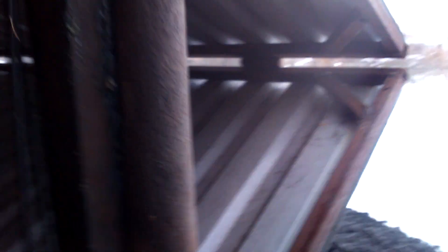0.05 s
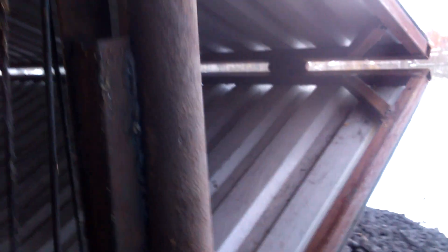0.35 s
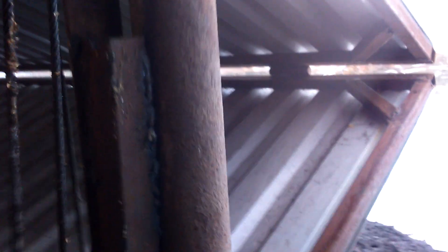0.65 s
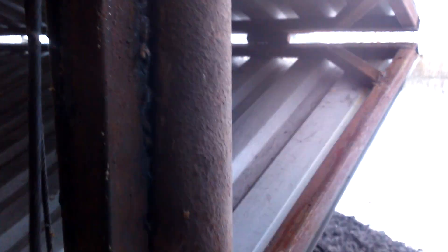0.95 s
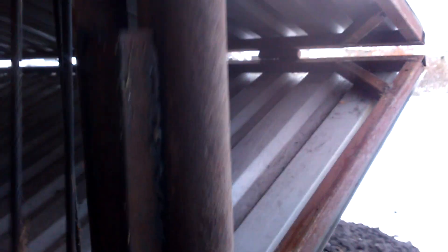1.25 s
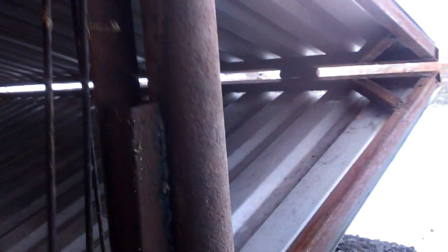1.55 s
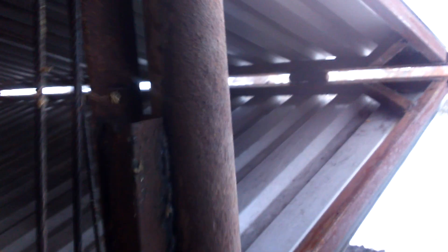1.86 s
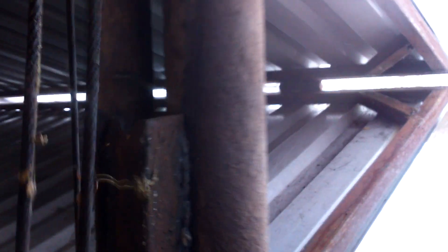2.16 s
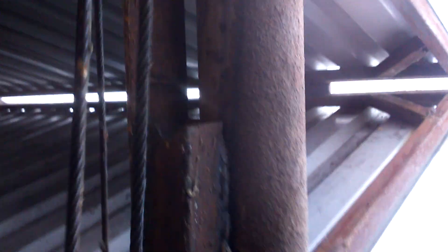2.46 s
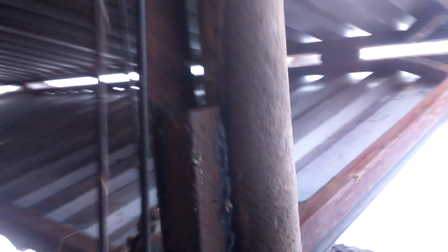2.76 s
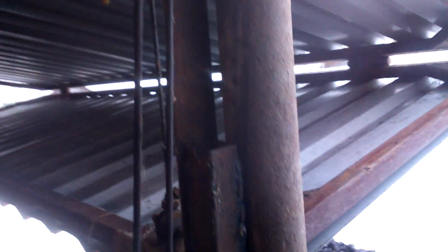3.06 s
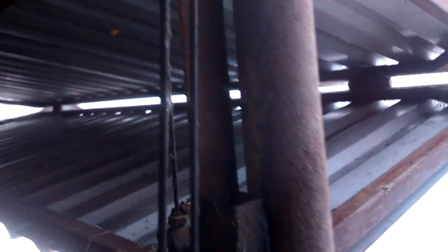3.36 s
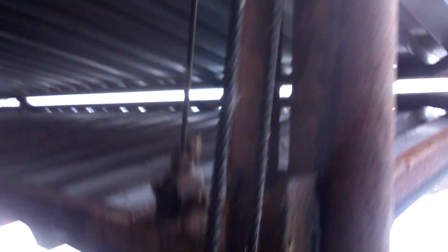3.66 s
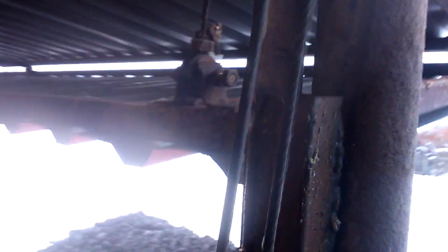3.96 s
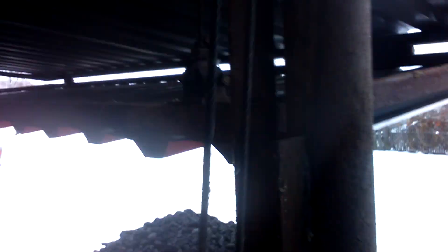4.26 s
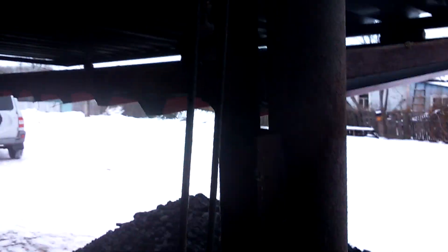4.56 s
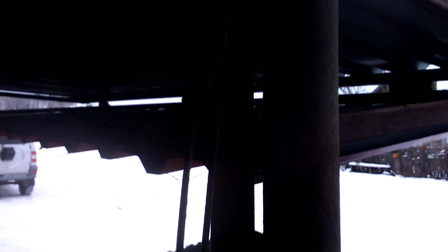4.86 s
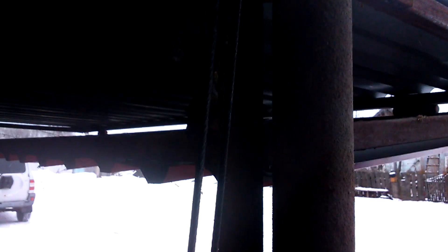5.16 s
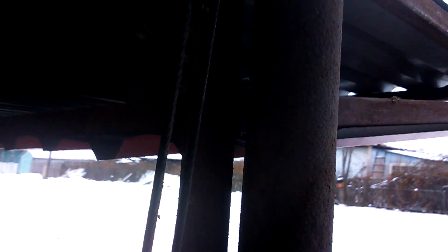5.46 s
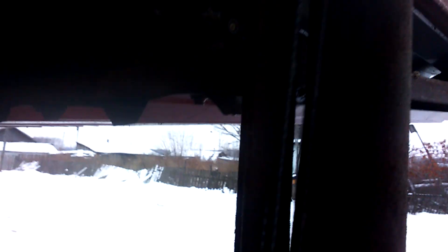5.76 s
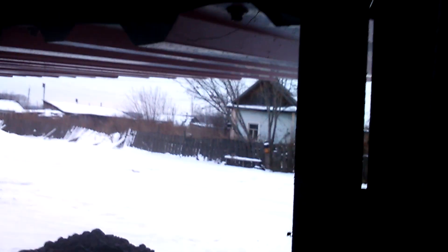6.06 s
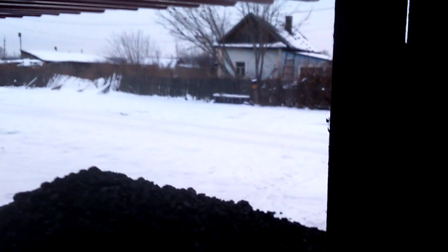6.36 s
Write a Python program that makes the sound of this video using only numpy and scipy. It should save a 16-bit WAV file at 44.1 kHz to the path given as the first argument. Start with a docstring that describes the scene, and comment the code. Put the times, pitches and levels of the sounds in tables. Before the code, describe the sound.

A corrugated steel folding gate is hauled up by cables. It starts with a loud clanking jolt and a bright scrape, then loose sheets chatter while the big panels boom and groan, with uneven knocks and sharp snaps. The track sings faintly. A very sharp, ringing snap comes late, and the gate glides to rest with faint handling clicks. Heard close by the gate post on one small, hissing microphone.

```python
"""Steel folding gate, hauled up

Close by the gate post, on one small, hissing microphone. Cables haul up the corrugated leaves,
which jolt and clank in their frame; loose sheets chatter and the big panels boom and groan.
A few sharp snaps cut through. The gate glides to rest, with faint handling clicks at the end."""
import sys
import numpy as np
from scipy import signal
from scipy.fft import rfft, irfft
from scipy.io import wavfile
from scipy.ndimage import uniform_filter1d

SR = 44100
rng = np.random.default_rng(int(sys.argv[2]) if len(sys.argv) > 2 else 0)


def put_to_file(sound):
    """Save the sound as 16-bit audio at rate SR, in the file named by the first command-line argument."""
    columns = np.atleast_2d(sound).T  # one column per channel
    safe = np.clip(columns, -1, 1)
    whole_steps = np.round(safe * 32767)
    wavfile.write(sys.argv[1], SR, whole_steps.astype(np.int16))


N = 291500
TIME = np.arange(N) / SR

# Leaves jolting in the frame. Each row: start in seconds, relative level in dB, brightness in
# nominal dB, number of hard blows.
JOLTS = [(0.278, -20, -23, 1), (.304, -7, -16.5, 4), (.679, -16, -18.5, 1), (.818, -15.5, -19, 2),
         (1.004, -18.5, -13, 1), (1.364, -17, -23, 1), (1.499, -21, -19, 1), (1.632, -21, -18, 4),
         (1.859, -27, -6.5, 1), (1.942, -22, -14, 1), (2.249, -27, -27, 1), (2.295, -30, -23, 1),
         (2.598, -18, -16, 1), (2.655, -18.5, -15, 1), (2.7365, -16.5, -9.5, 1), (2.786, -19.5, -17, 1),
         (2.881, -26.5, -9.5, 1), (2.956, -30, -10, 1), (3.106, -25.5, -16, 1), (3.329, -21.5, -17, 1),
         (3.343, -28, -9, 1), (3.39, -25, -25, 1), (3.541, -26.5, -26, 1), (3.653, -25, -16.5, 1),
         (3.71, -29.5, -22, 1), (3.8153, -26, -27.5, 1), (3.879, -22, -20, 1), (3.963, -24.5, -22, 1),
         (4.063, -26.5, -19, 1), (4.137, -20.5, -14.5, 1), (4.174, -34, -31, 1), (4.271, -27.5, -24, 1),
         (4.351, -29, -31, 1), (4.487, -32.5, -19, 1), (4.663, -35, -17, 1), (4.9, -27, -21, 1),
         (4.984, -21.5, -34, 2)]
# The steady haul, easing near the top. Each row: time in seconds, then relative levels in dB of
# chatter, groan and boom.
STEADY_HAUL = [(0, -34, -35, -30.5), (1.3, -34.5, -34.5, -31), (2.1, -35, -39.5, -33.5),
               (3.25, -29.5, -38, -33), (3.7, -34.5, -42.5, -37.5), (4.65, -40, -36.5, -36.5),
               (4.84, -45, -40, -41.5), (5.25, -43, -42.5, -36), (5.85, -45.5, -43, -42),
               (6.17, -64, -55, -44), (6.26, -75, -58.5, -47.5), (6.61, -63, -65, -55.5)]
# The gate catches and shakes. Each row: start and length in seconds, then relative levels in dB of
# chatter, groan, boom and scrape.
GATE_LURCHES = [(0.254, 0.056, -23, -23.5, -21, -37), (0.343, .12, -14.5, -29.5, -25.5, -14.5),
                (0.77, 0.12, -23, -42, -30.5, -38), (1.34, 0.076, -47, -24.5, -37, -50),
                (1.5, 0.088, -28, -38, -34, -42), (1.665, 0.19, -31, -43, -42, -41),
                (2.18, 0.19, -47, -33, -39, -56), (2.573, 0.23, -25.5, -31, -30.5, -31.5),
                (2.956, .09, -66, -29.5, -33, -39), (4.048, 0.079, -36, -37, -39, -61),
                (4.915, 0.1, -29.5, -29, -32.5, -32), (5.688, 0.44, -65, -41.5, -46, -68)]
# Sharp snaps, then faint handling clicks near the microphone at the end.
# Each row: start in seconds, relative level in dB, click pitch in Hz.
SNAPS_AND_CLICKS = [(.2609, -9.5, 9300), (.656, -20, 10500), (1.13, -19.5, 11000), (1.3515, -6, 9600),
                    (2.1557, -10, 8600), (2.1955, -6.5, 8460), (4.138, -15, 9800), (4.8985, -0.5, 9300),
                    (4.902, 0.5, 9500), (4.913, 0.5, 10400), (4.931, -14, 9550), (5.025, -18, 10500),
                    (6.118, -30, 8950), (6.32, -33, 9000), (6.429, -29, 9000)]
# Grazed fittings. Each row: start in seconds, pitch in Hz, peak in dB, the rasp's t60 in seconds.
FITTING_PINGS = [(1.349, 3960, -22, .06), (2.16, 2250, -28, .16), (2.2, 1950, -24.5, .12),
                 (2.53, 2800, -33, .12), (2.55, 2230, -28, .14), (4.612, 3500, -39, .07),
                 (4.712, 780, -28, .16), (4.722, 960, -28, .14), (4.899, 4255, -22, .07),
                 (4.9, 2450, -26, .18)]
# Brushing as the gate comes to rest. Each row: peak time and half length in seconds, level in dB.
BRUSH_SWELLS = [(5.503, 0.094, -41.5), (6.38, 0.093, -55.5)]
# How loudly the track sings. Each row: time in seconds, level in dB.
TRACK_LEVELS = [(0, -63.5), (1.4, -53), (2.9, -38.5), (3.5, -44.5), (4.2, -43.5), (4.8, -51), (5.15, -45),
                (5.45, -63.5), (6.61, -86)]

# Resonances of the steel sheets. Each row: frequency in Hz, weight in nominal dB.
STEEL_MODES = [(534, -5), (608.3, -65), (786.0, -44.5), (1200, -41), (1351, -35.5), (1421, -50),
               (1588, -50.5), (1637, -22), (1749, -44), (2035, -26), (2164, -56), (2272, -54.5),
               (2654, -31), (4250, -15)]
# The metallic ring after a snap. Each row: frequency in Hz, relative level in dB, t60 in seconds.
SNAP_RING = [(1380, -5, 0.16), (1865, 5, 0.18), (1874, -4, .14), (2070, -5, .16), (2283, 8, 0.22),
             (2370, 3, 0.16), (3340, -11, 0.1), (3700, -12.5, .1), (4680, -7, .08), (5550, -6, .09),
             (6250, -7.5, 0.089)]
# Resonances of frame, track and rollers. Each row: frequency and width in Hz, relative level in dB.
FRAME_HUM = [(198.7, 19, 4), (249.6, 25, -3), (302, 32, 2), (339.4, 3.4, -5.5)]
TRACK_SONG = [(1250, 27, -4), (1278, 21, 9.5), (1375, 7.4, 10), (1460, 8.4, -8.5), (4130, 100, -27)]
ROLLER_RING = [(705, 56, 3), (770, 56, -4), (987, 90, -0.5), (1130, 90, -6)]

# The spectrum of each sound. Each row: frequency in Hz, relative level in dB.
CLANK_SPECTRUM = [(100, -34.5), (300, -6), (450, -15), (750, 2), (1000, 0.5), (1550, 5), (2500, -3),
                  (3600, -13.5), (4300, -12.5), (6500, -16.5), (10000, -18.5), (15500, -40)]
CHATTER_SPECTRUM = [(200, -19), (450, 1), (750, 5), (1000, 2.5), (1380, 3.5), (1800, -0.5), (2400, -1.5),
                    (3500, -15), (6000, -34.5), (10000, -23), (15500, -58.5)]
GROAN_SPECTRUM = [(100, -10), (190, 1.5), (260, 5.5), (340, -2.5), (440, -13), (700, -8.5), (1150, -15.5),
                  (1700, -32.5), (4000, -51)]
BOOM_SPECTRUM = [(20, -16), (35, -17.5), (52, -1.5), (80, -1), (125, -0.5), (165, -15), (300, -20.5),
                 (1000, -65.5)]
SNAP_SPECTRUM = [(200, -10), (1000, -15), (3200, 3), (5500, -7), (7000, -7.5), (8300, 2), (10200, 0.5),
                 (13000, -1.5), (15500, -7.5)]
SCRAPE_SPECTRUM = [(500, -7.5), (2200, -3), (3300, -3), (6000, -4), (9500, 3.5), (11000, -1.5), (13000, -4),
                   (15500, -22)]
BRUSH_SPECTRUM = [(600, 20.5), (2000, 17.5), (3800, 12.5), (6000, 10), (9000, 17), (11000, 13), (15500, -3)]


def clanks(contact_db=-8, crack_db=-6, buzz_db=-5, wash_db=-3, usual_treble_db=-17, gain_db=25):
    """Each blow: a hard contact, a crack, the buzz of sheet on frame and the wash of the whole leaf."""
    force = np.zeros(N)
    wash = burst(t60=0.49, grain_db=-3)  # the same leaf answers every blow
    lowpass = signal.butter(1, 3000, fs=SR, output="sos")
    for start, db, treble_db in blows():
        crack = undb(crack_db) * burst(t60=0.12, grain_db=3)
        buzz = undb(buzz_db) * burst(t60=0.36, grain_db=5)
        blow = crack + buzz + undb(wash_db) * wash
        blow[0] += undb(contact_db)
        body = signal.sosfilt(lowpass, blow)
        # each blow has its own brightness
        treble = undb(0.75 * (treble_db - usual_treble_db)) * (blow - body)
        add(force, start, undb(db) * (body + treble))
    return undb(gain_db) * through(sheets(force), colour(CLANK_SPECTRUM))


def blows(bounce_s=0.047, bounce_db=-1.18, knocks_per_s=5):
    """Leaves strike, bounce and settle, with light knocks between; yields start, level, brightness."""
    for start, db, treble_db, count in JOLTS:
        for k in range(count):
            yield start + k * bounce_s, db + k * bounce_db, treble_db + 3 * k
        yield start + count * bounce_s, db + count * bounce_db - 4.5, treble_db - 27  # soft and dull
    knock_slots_s = np.arange(2.3, 4.65, 1 / knocks_per_s)
    for start, (late, soft) in zip(knock_slots_s, rng.random(size=(64, 2))):
        yield start + late / knocks_per_s, -28 - 4 * soft, -23


def chatter(level_db, taps_per_s=150, fixings=4, contact_db=-10, gain_db=-4):
    """Loose sheets tap against their fixings many times a second."""
    force = np.zeros(N)
    for _ in range(fixings):
        hits = rng.random(N) < taps_per_s / fixings / SR
        taps = hits * undb(3 * rng.standard_normal(N))
        shake = burst(t60=0.085, grain_db=-2)  # every fixing shakes the sheet in its own way
        shake[0] += undb(contact_db)
        force += through(taps, shake)
    force = steady(force, seconds=0.018) * undb(level_db + gain_db)
    return through(sheets(force), colour(CHATTER_SPECTRUM))


def sheets(force, width_hz=11):
    """The force plus the narrow resonances it wakes in the steel, most of all near 1.6 kHz."""
    modes = [(hz, width_hz, weight / 3 - 2.5 * abs(np.log2(hz / 1600))) for hz, weight in STEEL_MODES]
    ring = resonances(modes)
    ring /= np.abs(rfft(ring)).max()
    return force + 1.7 * through(force, ring)


def panels(groan_db, boom_db):
    """The big panels groan and boom as they slide, and the frame hums with them."""
    groan = rubbing(colour(GROAN_SPECTRUM), groan_db - 4, grain_db=7)
    hum = rubbing(resonances(FRAME_HUM), groan_db - 4.5, grain_db=-2.5)
    boom = rubbing(colour(BOOM_SPECTRUM), boom_db, grain_db=-3.5)
    return groan + hum + boom


def snaps_and_clicks(click_db=5, broadband_db=-15, crackle_db=-6, ring_db=-39):
    """Sharp snaps, then faint handling clicks near the microphone: each a tick, crackle and ring."""
    clicks, ringing = np.zeros((2, N))
    t = TIME[:SR // 2]
    for start, db, click_hz in doubled_clicks():
        tick = undb(crackle_db) * burst(t60=0.078, grain_db=1.5)
        tick[0] += 1
        click = signal.lfilter(*signal.iirpeak(click_hz, Q=4, fs=SR), tick) + undb(broadband_db) * tick
        add(clicks, start, undb(db + click_db) * click)
        ring = sum(undb(mode_db) * fade(t, t60) * np.sin(2 * np.pi * (hz * t + rng.random()))
                   for hz, mode_db, t60 in SNAP_RING)
        add(ringing, start, undb(1.16 * db + ring_db) * ring)  # faint clicks hardly ring
    # all-passes spread each click over about a millisecond
    _, poles = signal.iirpeak(9800, Q=4, fs=SR)
    for _ in range(3):
        clicks = signal.lfilter(poles[::-1], poles, clicks)
    return through(clicks, colour(SNAP_SPECTRUM)) + ringing


def doubled_clicks(repeat_s=0.008, repeat_db=-8.5):
    """Each snap or click and a weaker one just behind it; yields start, level, pitch."""
    for start, db, hz in SNAPS_AND_CLICKS:
        yield start, db, hz
        yield start + repeat_s, db + repeat_db, hz


def running_gear(haul_groan_db):
    """The track sings under the rollers, which run steadily in their guide."""
    track_db = np.interp(TIME, *np.transpose(TRACK_LEVELS))
    track = rubbing(resonances(TRACK_SONG), track_db, grain_db=-6)
    rollers = rubbing(resonances(ROLLER_RING), haul_groan_db - 8.5, grain_db=3.5)
    return track + rollers


def scrape(level_db):
    """Gate and cable rub with a bright rasp that flickers as they catch."""
    catching_db = 3.5 * flutter(per_second=60)
    return rubbing(colour(SCRAPE_SPECTRUM), level_db + catching_db - 11, grain_db=8.5)


def pings(width_hz=80):
    """Pins and brackets are grazed: a brief rasp keeps one resonance ringing."""
    out = np.zeros(N)
    for start, hz, db, t60 in FITTING_PINGS:
        ring = through(burst(t60, grain_db=9), resonances([(hz, width_hz, 0)]))
        add(out, start, undb(db) * ring / np.abs(ring).max())
    return out


def brushings():
    """Light rubbing swells and fades as the gate glides to rest."""
    swell = sum(undb(db) / (1 + ((TIME - peak_s) / half_s) ** 4) for peak_s, half_s, db in BRUSH_SWELLS)
    return swell * rubbing(colour(BRUSH_SPECTRUM), level_db=0, grain_db=3)


def shaken(haul_db, part, t60, attack_s=0.026):
    """Level in dB of one part: the steady haul plus every lurch, which rises, holds and dies away."""
    power = undb(haul_db) ** 2
    t = TIME[:3 * SR // 2]
    rise = np.minimum(t / attack_s, 1)
    column = ("chatter", "groan", "boom", "scrape").index(part)
    for start, length, *levels_db in GATE_LURCHES:
        release = fade(np.maximum(t - length, 0), t60)
        add(power, start, (undb(levels_db[column]) * rise * release) ** 2)
    return 10 * np.log10(power)


def burst(t60, grain_db):
    """Grainy dying noise of unit energy, as of bending waves scattered by corrugations."""
    t = TIME[:SR // 2]
    noise, grain = rng.standard_normal((2, len(t)))
    wave = noise * undb(grain_db * grain) * fade(t, t60)
    return wave / np.linalg.norm(wave)


def rubbing(response, level_db, grain_db):
    """Dense tiny slips, coloured by the part that they shake."""
    slips = rng.standard_normal(N) * undb(grain_db * rng.standard_normal(N))
    return steady(through(slips, response), seconds=0.12) * undb(level_db)


def resonances(modes):
    """Ringing response of unit energy, one damped cosine for each mode."""
    t = TIME[:SR // 2]
    ring = sum(undb(db) * np.sqrt(width) * np.exp(-np.pi * width * t) * np.cos(2 * np.pi * hz * t)
               for hz, width, db in modes)
    return ring / np.linalg.norm(ring)


def colour(spectrum, size=8192):
    """Minimum-phase response of unit energy with the given spectrum."""
    hz, db = np.transpose(spectrum)
    grid_hz = np.maximum(np.arange(size // 2 + 1) * SR / size, 1)
    grid_db = np.interp(np.log(grid_hz), np.log(hz), db)
    cepstrum = irfft(np.log(undb(grid_db)))
    cepstrum[1:size // 2] *= 2
    cepstrum[size // 2 + 1:] = 0
    response = irfft(np.exp(rfft(cepstrum)))
    return response / np.linalg.norm(response)


def flutter(per_second):
    """Random levels, held briefly and smoothed; spread near 1."""
    hold = int(SR / per_second)
    steps = np.repeat(rng.standard_normal(N // hold + 1), hold)
    return uniform_filter1d(steps, hold)[:N]


def rms(x, seconds):
    """Running RMS level."""
    return np.sqrt(uniform_filter1d(x ** 2, int(seconds * SR)).clip(1e-12))


def steady(x, seconds):
    """Even out slow swells, leaving the quick flutter."""
    return x / rms(x, seconds)


def undb(db):
    """Decibels to gain."""
    return 10 ** (np.asarray(db) / 20)


def fade(t, t60):
    """Exponential decay, 60 dB down at t60."""
    return np.exp(-np.log(1000) * t / t60)


def add(track, start_s, sound):
    """Mix a sound into a track."""
    start = max(int(start_s * SR), 0)
    track[start:start + len(sound)] += sound[:max(N - start, 0)]


def through(x, response):
    """Convolve, keeping the length."""
    return signal.fftconvolve(x, response)[:len(x)]


def scene(cable_rub_db=-55.5):
    """The gate from beside its post, in mono, following the haul and its lurches."""
    times, *columns = np.transpose(STEADY_HAUL)
    haul_chatter_db, haul_groan_db, haul_boom_db = (np.interp(TIME, times, db) for db in columns)
    haul_scrape_db = np.maximum(haul_chatter_db - 12, cable_rub_db)  # the cable always rubs a little
    chatter_db = shaken(haul_chatter_db, "chatter", t60=1)
    groan_db = shaken(haul_groan_db, "groan", t60=0.61)
    boom_db = shaken(haul_boom_db, "boom", t60=0.64)
    scrape_db = shaken(haul_scrape_db, "scrape", t60=0.19)
    sliding = panels(groan_db, boom_db) + running_gear(haul_groan_db) + scrape(scrape_db)
    return (clanks() + chatter(chatter_db) + sliding + brushings() + snaps_and_clicks() + pings())[None]


def record(dry, port_hz=8570, port_width_hz=850, port_db=8, hiss_db=-77, ceiling_db=-13, top_hz=15800):
    """A small hissing microphone, weak in the deep bass, its port ringing in the treble; a limiter."""
    thinned = signal.sosfilt(signal.butter(3, 36, "high", fs=SR, output="sos"), dry)
    port = signal.lfilter(*signal.iirpeak(port_hz, port_hz / port_width_hz, fs=SR), thinned)
    picked_up = thinned + undb(port_db) * port + undb(hiss_db) * rng.standard_normal(N)
    limiter_gain = np.minimum(1, undb(ceiling_db) / rms(picked_up, seconds=0.012))
    limited = picked_up * uniform_filter1d(limiter_gain, size=200)
    lowpass = signal.ellip(8, 0.2, 70, top_hz, fs=SR, output="sos")
    return signal.sosfilt(lowpass, np.tanh(limited))


dry = scene()
out = record(dry)
put_to_file(out)
```